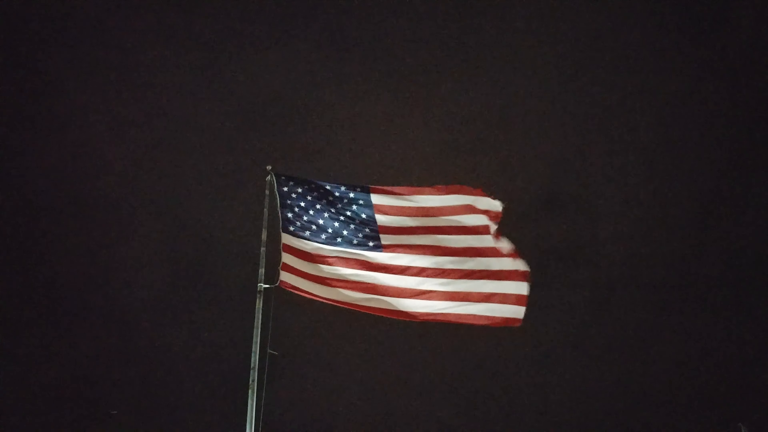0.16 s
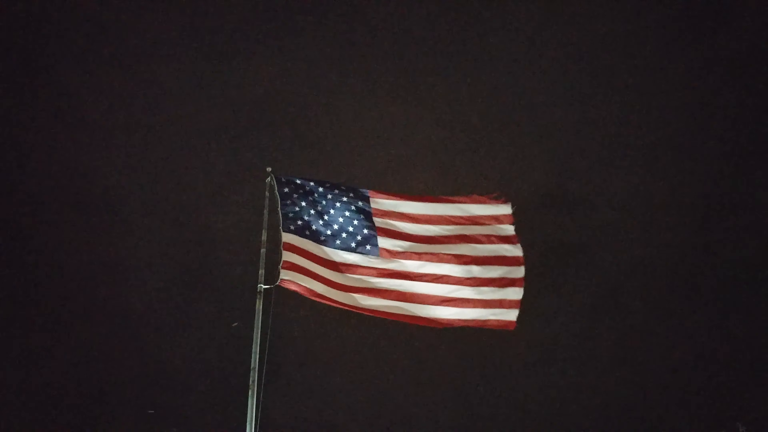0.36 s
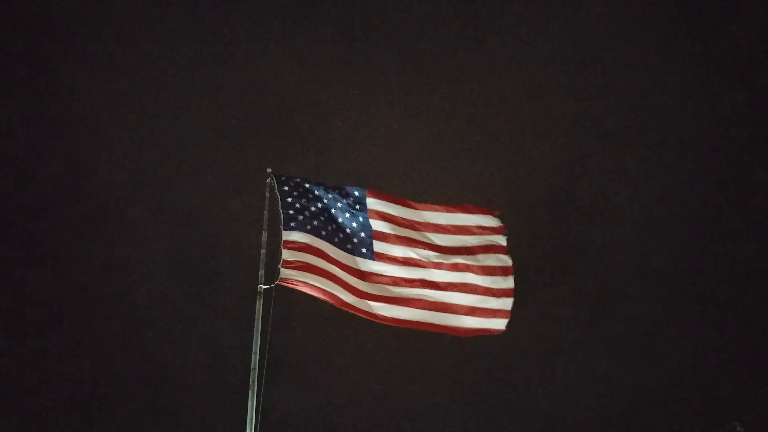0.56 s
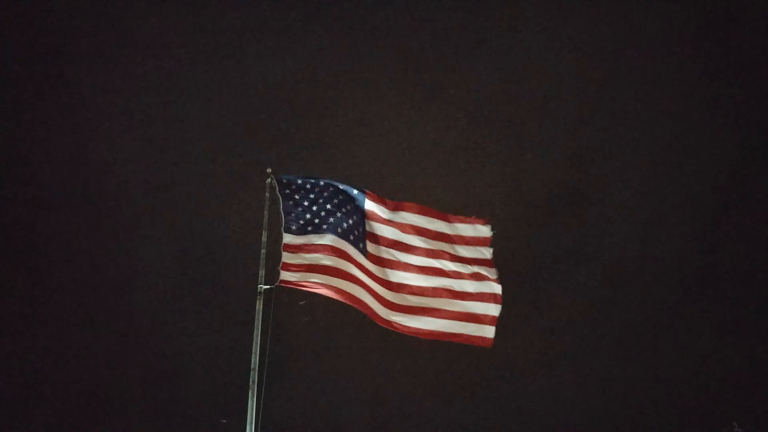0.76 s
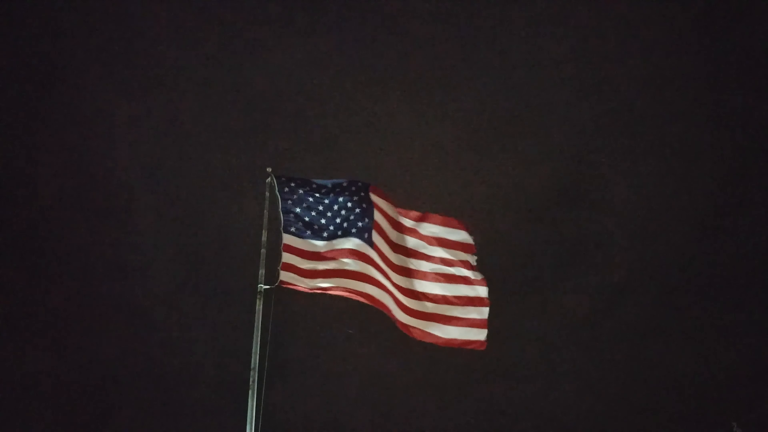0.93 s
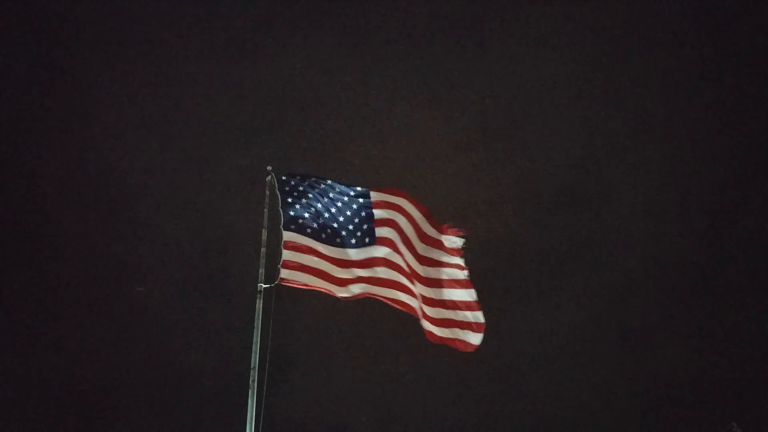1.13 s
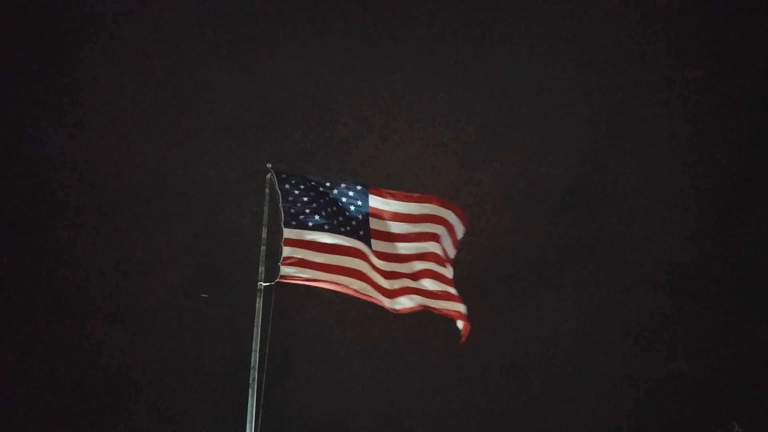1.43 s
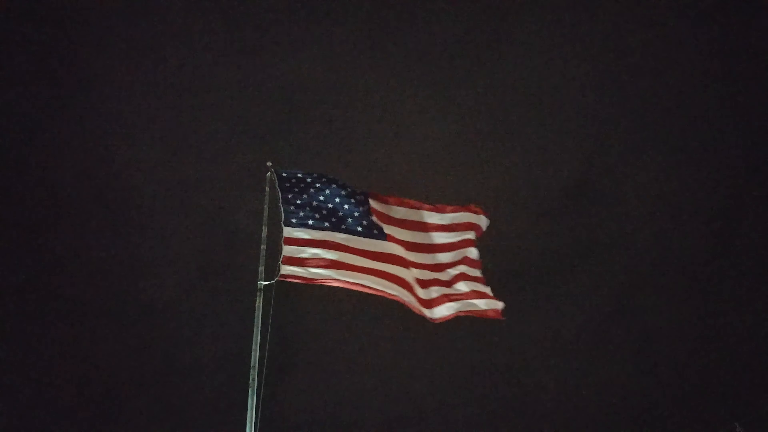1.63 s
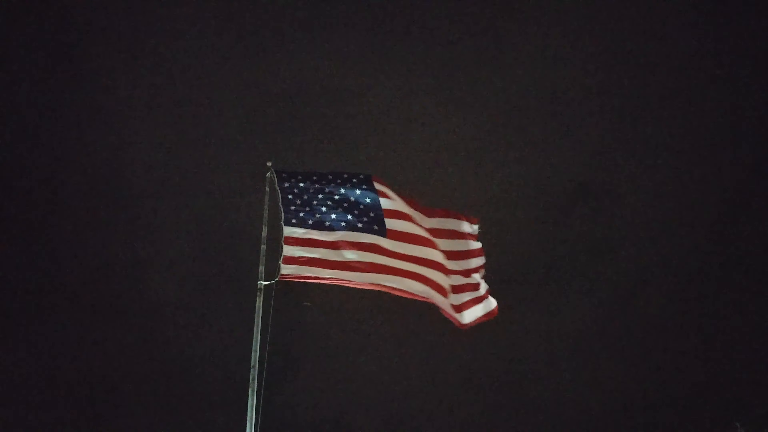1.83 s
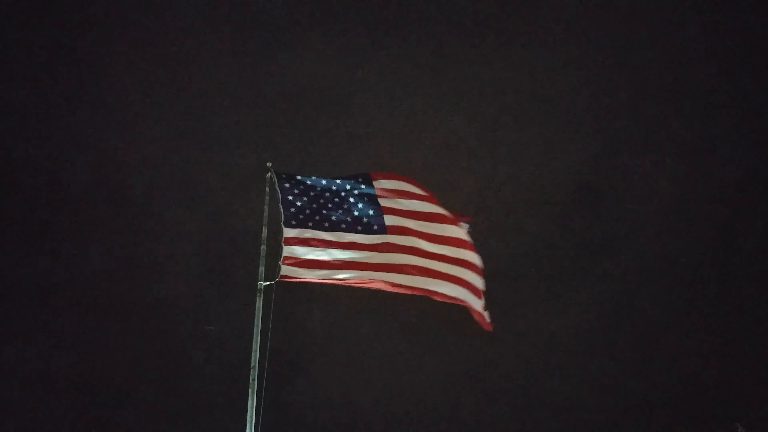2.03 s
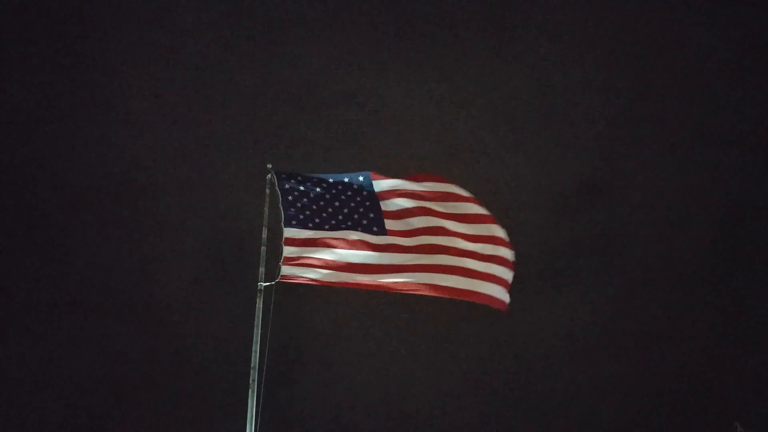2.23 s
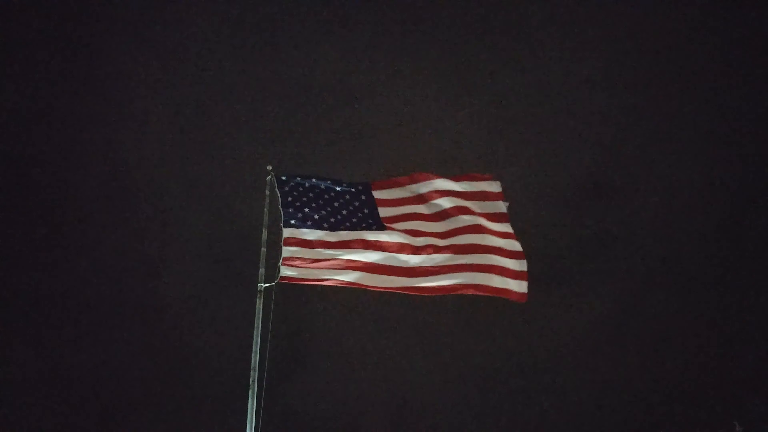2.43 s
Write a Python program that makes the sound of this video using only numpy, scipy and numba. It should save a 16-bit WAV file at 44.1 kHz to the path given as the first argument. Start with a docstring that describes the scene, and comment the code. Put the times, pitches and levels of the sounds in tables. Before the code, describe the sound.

Flag flapping on a tall pole, sharp cloth pops giving way to heavy low wind buffeting

```python
"""Cloth pops, rustles and ticks overhead, then gusts buffet the microphone ports, each on its own.
A flag flaps on a tall pole at night, heard from below on a phone with two microphone ports.
Pops are short rings, rustle and the far roar of moving air are flickering noise, ticks are bright
noise bursts, and gusts are noise throbbing at a wandering pitch.
The phone turns each channel down after a loud gust and lets it come back slowly."""
import sys
import numpy as np
from scipy import signal
from scipy.fft import rfft, irfft
from scipy.io import wavfile
from scipy.ndimage import uniform_filter1d, map_coordinates
from numba import njit

SR = 44100
rng = np.random.default_rng(int(sys.argv[2]) if len(sys.argv) > 2 else 0)


def persist_wave(psi):
    """Save psi, clipped to +-1, as 16-bit WAV."""
    counts = np.round(np.clip(psi, -1, 1) * 32767).astype(np.int16)
    wavfile.write(sys.argv[1], SR, np.atleast_2d(counts).T)


N = 113778  # length in samples


def undb(db):
    """Amplitude factor of a level in dB."""
    return 10 ** (np.asarray(db) / 20)


def level(x, db):
    """Scale a signal to an rms level in dB."""
    return x * undb(db) / np.sqrt(np.mean(x ** 2))


def lowpass(x, order, hz):
    """Butterworth low-pass."""
    return signal.sosfilt(signal.butter(order, hz, fs=SR, output="sos"), x)


@njit
def moving_band(x, hz, k, rate):
    """Band-pass whose centre may move every sample; k = width / centre."""
    y, band_state, low_state = np.empty(len(x)), 0., 0.
    for i in range(len(x)):
        g = np.tan(np.pi * hz[i] / rate)
        v = (band_state + g * (x[i] - low_state)) / (1 + g * (g + k))
        band_state = 2 * v - band_state
        low_state = low_state + 2 * g * v
        y[i] = k * v
    return y


def band(x, hz, width_hz):
    """Band-pass with a fixed centre."""
    return moving_band(x, np.full(N, 1. * hz), width_hz / hz, 1. * SR)


def walk(rate):
    """Random levels held 1 / rate s and slewed twice; spread near 1."""
    hold = int(SR / rate)
    steps = np.repeat(rng.standard_normal(N // hold + 1), hold)
    return 1.18 * uniform_filter1d(uniform_filter1d(steps, hold), hold)[:N]


def air(points, flicker_db):
    """Noise with a given spectrum in half-octave bands that flicker alone; rms 1."""
    hz, db = np.array(points, float).T
    f = np.arange(N // 2 + 1) * SR / N + 1  # 1 Hz up, to keep the logarithm finite
    spectrum = rfft(rng.standard_normal(N))
    spectrum = spectrum * undb(np.interp(np.log(f), np.log(hz), db, left=-60, right=-90))
    out = 0
    for centre in 20 * 2 ** np.arange(0, 10, .5):
        share = np.clip(1 - abs(2 * np.log2(f / centre)), 0, 1)
        out = out + irfft(spectrum * share, N) * undb(flicker_db * walk(18))
    return level(out, 0)


def swell(start, length, rise, fall):
    """Rise, hold, then die away; the length counts from the start of the rise."""
    t = np.arange(N) / SR - start
    return np.clip(t / rise, 0, 1) * np.exp(-np.maximum(t - length, 0) / fall)


def add(out, start, x):
    """Mix a short sound in at a time in seconds."""
    i = int(start * SR)
    out[i:i + len(x)] += x[:N - i]


POP_CYCLES, POP_RISE_CYCLES = .8, 0.12  # decay and onset, in cycles of the pop's pitch
POP_EDGE = .5  # strength of the octave above


def pop(hz):
    """A pull of air, a push back and a short ring, with a brighter edge an octave up."""
    cycles = np.arange(400) / SR * hz
    ring = np.sin(2 * np.pi * cycles) * np.exp(-cycles / POP_CYCLES)
    edge = POP_EDGE * np.sin(2 * np.pi * 2.0 * cycles) * np.exp(-cycles / .5)
    onset = 1 - np.exp(-(cycles / POP_RISE_CYCLES) ** 2)
    return -(ring + edge) * onset * 1.56


# Single pops of the cloth high on the pole, levels as sent toward the microphones.
# Each row: time in seconds, level in dB, pitch in Hz.
CLOTH_POPS = [(.1258, 0, 800), (.133, -5, 700), (.168, -7, 550), (.176, -11, 600), (.234, -11, 600),
              (.245, -10, 900), (.300, -13, 800), (.316, -9, 450), (.3585, -7, 600), (.367, -6, 800),
              (.384, -9, 1000), (.425, -13, 400), (1.133, -13, 500), (1.560, -8, 750), (1.582, -6, 650),
              (1.9068, -7, 1350), (1.915, -15, 1000), (2.311, -8, 1000)]
# Flaps overhead: showers of small pops with a rustle.
# Each row: start in seconds, length in seconds, level of the pops in dB, level of the rustle in dB.
CLOTH_FLAPS = [(0.063, 0.067, -22, -40.5), (0.191, 0.049, -24.5, -49), (0.225, 0.028, -18.5, -44),
               (0.349, 0.033, -19, -38), (0.406, 0.031, -26, -62), (0.453, 0.048, -43, -52),
               (1.125, 0.015, -21.5, -78.5), (1.535, 0.061, -20.5, -36), (1.601, 0.262, -29.5, -80),
               (1.887, 0.048, -34, -55), (2.021, 0.037, -23.5, -48.5), (2.189, 0.038, -24.5, -43.5),
               (2.295, 0.088, -20.5, -44.5), (2.41, 0.093, -29, -46.5)]
POP_TAIL_DB, POP_TAIL_S = -20, .01  # wash behind a pop: level against the pop, decay
FLAP_RISE_S, FLAP_FALL_S = 0.012, 0.019
FLAP_PER_S, FLAP_HZ, FLAP_SCATTER_DB = 2000, 815, 6  # small pops: density, central pitch, spread
CLOTH_TOP_HZ = 3800


def flag():
    """Cloth snapping in the air: pops with a short noise wash behind them, and showers of small pops."""
    pops, wash = np.zeros(N), band(rng.standard_normal(N), 600, 840)
    for time, db, hz in CLOTH_POPS:
        add(pops, time - 0.27 / hz, undb(db) * pop(hz))  # starts about a quarter cycle early
        pops += level(wash, db + POP_TAIL_DB) * swell(time, 0, 0.0012, POP_TAIL_S)
    shower = np.zeros(N)
    for when, pitch, chance in rng.random((int(FLAP_PER_S * N / SR), 3)):
        strength = undb(-FLAP_SCATTER_DB * np.log(chance + 0.045))  # a few are much louder
        add(shower, when * N / SR, strength * pop(FLAP_HZ * 2 ** (1.92 * pitch - 1)))
    flaps = sum(undb(db) * swell(start, length, FLAP_RISE_S, FLAP_FALL_S)
                for start, length, db, _ in CLOTH_FLAPS)
    return lowpass(pops + level(shower, 0) * flaps, 3, CLOTH_TOP_HZ)


# Spectrum of the cloth's rustle. Each row: frequency in Hz, density in dB per Hz (relative).
RUSTLE_SPECTRUM = [(1500, 4.5), (3000, 2.5), (5000, -1), (7000, -9), (10000, -14.5), (12000, -31),
                   (15000, -20)]
# The faint rustle between flaps. Each row: time in seconds, level in dB.
FAINT_RUSTLE = [(0, -51.5), (.3, -51), (0.549, -55), (.63, -63.5), (1.33, -69), (1.39, -49.5), (1.5, -62),
                (1.619, -50), (1.799, -54), (2.13, -50.5), (2.18, -78), (2.58, -49.5)]
RUSTLE_RISE_S = .025


def rustle():
    """Fine crackle of the cloth: fast-flickering noise, swelling with each flap."""
    steady = undb(np.interp(np.arange(N) / SR, *np.array(FAINT_RUSTLE).T))
    flaps = sum(undb(db) * swell(start, length, RUSTLE_RISE_S, FLAP_FALL_S)
                for start, length, _, db in CLOTH_FLAPS)
    crackle = undb(1.3 * walk(300))
    return air(RUSTLE_SPECTRUM, 0.57) * crackle * (steady + flaps)


# Sharp ticks of the fly end, the flag's free edge. Each row: time in seconds, level in dB.
FLY_END_TICKS = [(.0865, -16), (.0935, -25), (.0995, -23), (.1140, -21), (.3740, -32), (1.569, -31)]
TICK_RISE_S, TICK_FALL_S = 0.00065, .0009


def ticks():
    """Very short bright cracks: two treble bands of noise under a fast rise and fall."""
    crack = level(band(rng.standard_normal(N), 8500, 2700), -2.0)
    crack = crack + level(band(rng.standard_normal(N), 13500, 3000), 0.5)
    return sum(undb(db) * crack * swell(time, 0, TICK_RISE_S, TICK_FALL_S) for time, db in FLY_END_TICKS)


# Spectrum of the low breeze at a port. Each row: frequency in Hz, density in dB per Hz (relative).
BREEZE_SPECTRUM = [(25, -22.5), (40, -7.5), (60, 2.5), (110, -1), (200, -7), (400, -17.5), (800, -31)]
GUST_RISE_S, GUST_FALL_S = 0.014, 0.012
EDDY_WANDER, EDDY_WIDTH = 0.25, 0.86  # limit of the pitch's log drift; first filter's width / centre
GUST_BASS_DB = -6.5  # against the eddy
WIND_TOP_HZ = 950


def wind(gusts, breeze_db):
    """Eddies at one port: a low breeze, and gusts that throb at a wandering pitch over a stronger bass."""
    bass = air(BREEZE_SPECTRUM, 3.1)
    out = undb(breeze_db + 0.5 * walk(3.2)) * bass
    for start, length, db, hz in gusts:
        centre = hz * np.exp(EDDY_WANDER * np.tanh(walk(35)))
        eddy = moving_band(rng.standard_normal(N), centre, EDDY_WIDTH, 1. * SR)
        eddy = moving_band(eddy, centre, 0.9, 1. * SR)
        body = level(eddy, 0) + level(bass, GUST_BASS_DB)
        gust = swell(start, length, GUST_RISE_S, GUST_FALL_S) * body
        gust_rms = np.sqrt(np.sum(gust ** 2) / (length * SR))  # over the gust's own length
        out = out + gust * undb(db) / gust_rms
    return lowpass(out, 3, WIND_TOP_HZ)


# Spectrum of the far moving air. Each row: frequency in Hz, density in dB per Hz (relative).
ROAR_SPECTRUM = [(150, 3), (400, -7.5), (800, -5), (1500, -10), (2500, -19.5), (3500, -28.5), (4500, -46.5)]
ROAR_DB = -31


def roar(flicker_db):
    """Far roar of moving air: broad noise whose bands flicker."""
    return undb(ROAR_DB) * air(ROAR_SPECTRUM, flicker_db)


# Gusts striking the left and the right port, right at the microphones.
# Each row: start in seconds, length in seconds, level in dB, eddy pitch in Hz.
LEFT_PORT_GUSTS = [(.54, 0.035, -10.5, 70), (.63, 0.072, -3, 112), (.735, 0.08, -2.5, 169),
                   (.79, 0.19, -6, 89.7), (1.0, 0.1, -7, 107.6), (1.095, 0.094, -2, 238),
                   (1.22, 0.038, -6, 245), (1.31, 0.029, -6.5, 126), (1.425, 0.038, -9.5, 230),
                   (1.465, 0.052, -5.5, 80), (1.69, 0.016, -1.5, 139), (1.83, 0.012, -4, 105),
                   (1.92, 0.083, -10, 106.5), (2.01, 0.074, -6, 165), (2.065, 0.04, 8, 89),
                   (2.105, 0.019, 11.5, 212), (2.14, 0.11, -10, 106), (2.275, 0.1, -0.5, 169.5),
                   (2.41, 0.14, -12, 84.6)]
RIGHT_PORT_GUSTS = [(.6, 0.13, -10.5, 110), (.78, 0.089, -6, 146), (.89, 0.19, -15.5, 129.5),
                    (1.02, 0.094, -15.5, 120), (1.085, 0.07, -11.5, 115), (1.165, 0.064, -11.5, 190),
                    (1.25, 0.038, -11, 128.5), (1.34, 0.15, -12, 127.6), (1.485, 0.037, -9.5, 183),
                    (1.55, 0.04, -15.5, 105), (2.05, 0.092, -21, 89.4), (2.14, 0.17, -9.5, 151),
                    (2.33, 0.12, -13.5, 140)]
# Level of the breeze at the left port, then the right, in dB.
PORT_BREEZE = (-16.5, -20)
LEFT_LAG_S, LEFT_DB = .00011, -1.5  # shared sound at the left port, against the right
ROAR_APART_DB, RUSTLE_APART_DB, TICK_APART_DB = -1, -2, -3  # each port's own part, before the port


def scene():
    """The flag from below: shared sound reaches the left port later and softer; wind is separate."""
    right = flag() + roar(1.0) + rustle() + ticks()
    left = map_coordinates(right, [np.arange(N) - LEFT_LAG_S * SR], mode="mirror") * undb(LEFT_DB)
    # part of the roar, rustle and ticks reaches each port by its own way
    own = [undb(ROAR_APART_DB) * roar(2.7) + undb(RUSTLE_APART_DB) * rustle()
           + undb(TICK_APART_DB) * ticks() for _ in range(2)]
    return np.array([left + own[0] + wind(LEFT_PORT_GUSTS, PORT_BREEZE[0]),
                     right + own[1] + wind(RIGHT_PORT_GUSTS, PORT_BREEZE[1])])


@njit
def follow(x, up, down):
    """Level detector, quick to rise and slow to fall."""
    y, e = np.empty(len(x)), 1e-4
    for i in range(len(x)):
        e += (abs(x[i]) - e) * (up if abs(x[i]) > e else down)
        y[i] = e
    return y


PORT_HZ, PORT_WIDTH_HZ, PORT_DB, PORT_TOP_HZ = 8900, 1600, 9, 9800  # added ring, then the dull edge
THRESHOLD_DB, RATIO, ATTACK_S, RELEASE_S = -5, 6, 0.0037, .22  # gain control
TOP_HZ = 15700  # upper limit of the phone's sound


def record(dry):
    """The ports ring in the treble and dull above it; gain control per channel; the loudest peaks clip."""
    out = []
    for x in dry:
        ring = band(band(x, PORT_HZ, PORT_WIDTH_HZ), PORT_HZ, 2 * PORT_WIDTH_HZ)
        x = x + undb(PORT_DB) * ring
        high = signal.sosfilt(signal.butter(4, 11500, "high", fs=SR, output="sos"), x)
        x = lowpass(x, 8, PORT_TOP_HZ) + undb(-4.5) * high
        heard = follow(x, 1 / (ATTACK_S * SR), 1 / (RELEASE_S * SR))
        out.append(x * np.minimum(undb(THRESHOLD_DB) / heard, 1) ** (1 - 1 / RATIO))
    loud = np.clip(out, -1.5, 1.5)
    soft = loud - 4 / 27 * loud ** 3  # bends smoothly to full scale
    limited = signal.sosfilt(signal.ellip(8, .2, 70, TOP_HZ, fs=SR, output="sos"), soft)
    return np.clip(limited, -1, 1)


dry = scene()
out = record(dry)
persist_wave(out)
```